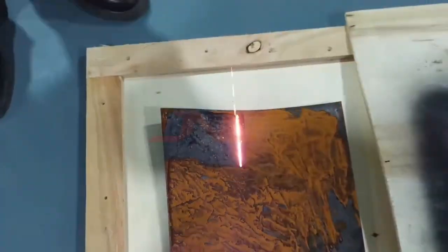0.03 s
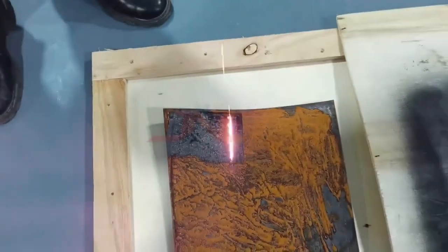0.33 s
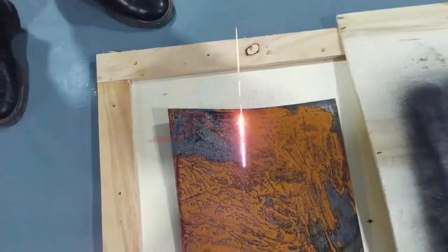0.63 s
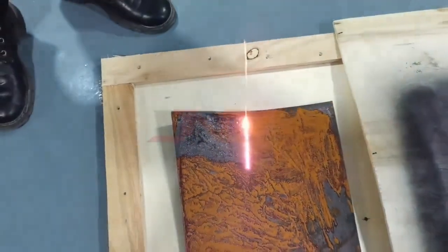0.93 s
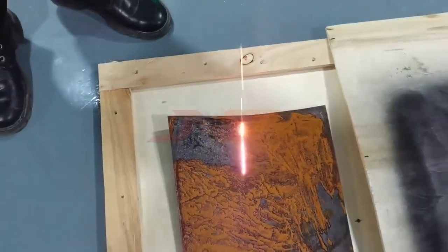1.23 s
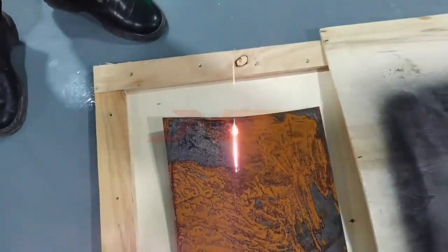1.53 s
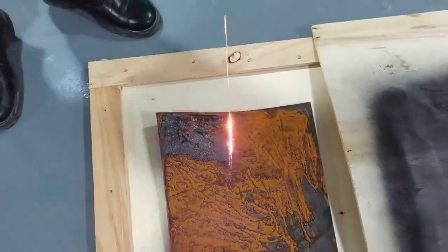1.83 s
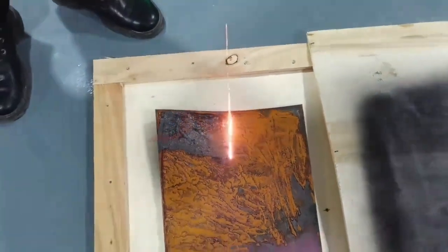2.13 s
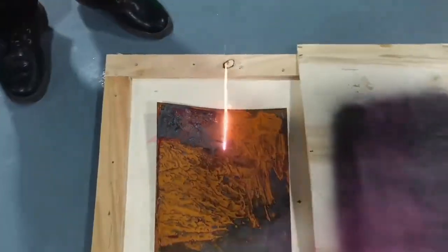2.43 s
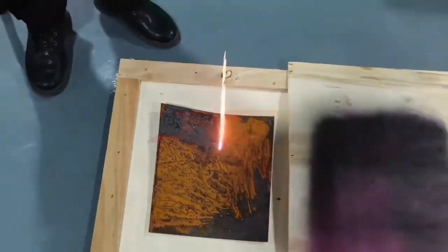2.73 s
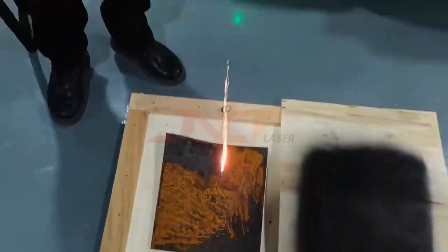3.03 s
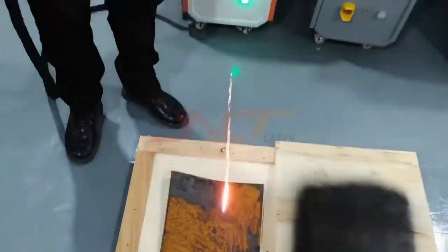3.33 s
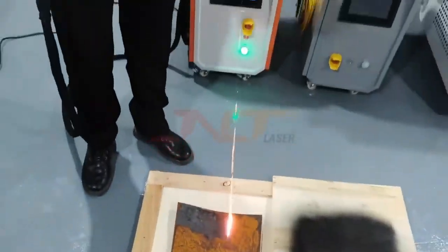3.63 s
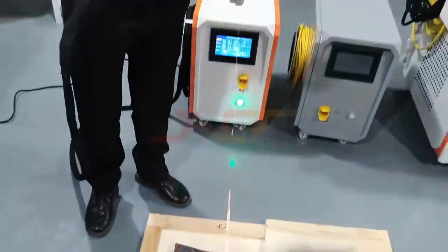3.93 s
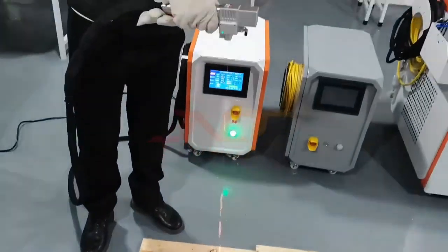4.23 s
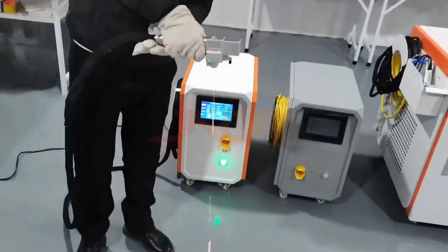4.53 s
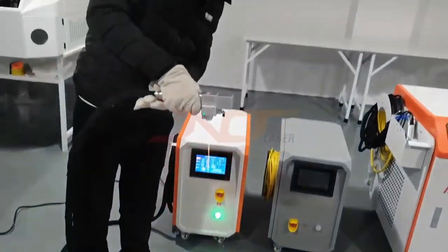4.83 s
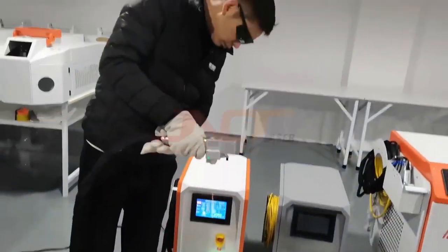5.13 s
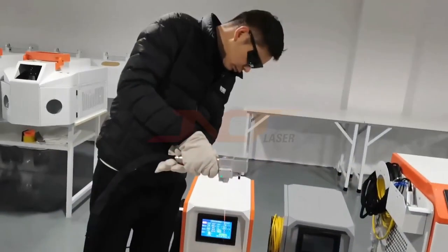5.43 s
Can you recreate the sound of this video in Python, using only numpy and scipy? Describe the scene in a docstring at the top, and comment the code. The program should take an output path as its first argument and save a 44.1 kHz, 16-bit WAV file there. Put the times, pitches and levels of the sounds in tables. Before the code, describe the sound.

In a workshop, rust crackles and buzzes in short, irregular spurts as a laser sweeps over a steel plate. After nearly two seconds the beam bites in and the rasp runs without a break, with a gritty sizzle and a low drone. It eases a little and takes on a slight metallic ring as the microphone moves away. A quiet fan and a faint rumble lie behind it.

```python
"""A hand-held cleaning laser sweeps to and fro over a rusty steel plate, 89 times a second.
Bursting rust pops at the turn of each sweep and rasps along the strokes, first in bursts, then
without a break. Echoes smear the pops into a harsh buzz, grit sizzles and loose flakes crack off.
The microphone backs away. A cooling fan and a faint rumble run underneath."""
import sys
import numpy as np
from scipy.fft import rfft, irfft, next_fast_len
from scipy.io import wavfile
from scipy.ndimage import uniform_filter1d, map_coordinates

SR = 44100
rng = np.random.default_rng(int(sys.argv[2]) if len(sys.argv) > 2 else 0)


def wav_out(sig):
    """Save sig, one row per channel (or a flat mono array), as 16-bit PCM at SR to the path in sys.argv[1]."""
    wavfile.write(sys.argv[1], SR, np.round(np.clip(np.atleast_2d(sig).T, -1, 1) * 32767).astype(np.int16))


N = 245637

SWEEP_HZ, TOP_HZ = 88.87, 14100  # the buzz is made of harmonics: multiples of the sweep rate
FULL_DB = -30  # body level of a full burst
STRIKE_S = 1.768  # the beam bites into thick rust and stays there

# Three bands called body, bite and fizz. Each row: low edge in Hz, high edge in Hz.
BANDS = [(750, 2500), (2500, 6000), (6000, 14000)]
# The beam crosses rust patches. Each row: time of full strength and hold in seconds, body level in dB,
# bite and fizz in dB above the body, share heard as one sharp pop.
BURSTS = [(0, 0.0067, -38.5, 4, 1, 0.75), (0.083, 0.014, -34, 4, -7, 0.73),
          (0.126, 0.045, -32.5, -3, -10, 0.78), (0.24, 0.013, -41.5, 6.5, 0, .6),
          (0.307, 0.013, -35, -9, -10, 0.66), (0.35, .03, -31, -2, -8.5, 0.76),
          (0.394, 0.013, -30.5, -4, -9.5, 0.7), (.44, .03, -33, 4, -5, 0.54),
          (0.522, 0.061, -35, 0, -4, 0.1), (0.69, .012, -32.5, 4.5, -6, .35),
          (0.727, 0.011, -34.5, -6, -8, .72), (.79, 0.022, -39, -2.5, -7, 0.24),
          (0.996, 0.096, -31.5, 1.5, -4.5, 0.3), (1.185, 0.042, -35.5, 0.5, -6, 0.6),
          (1.292, .005, -41.5, 0, 0, 1), (1.33, 0.014, -29, 2, -5.5, 0.3),
          (1.47, .02, -38, 2.5, -3.5, 0.64), (1.521, 0.026, -40.5, 4, -10, 0.52),
          (2.459, 0.0083, -30, -4.5, -9, 0.33), (2.561, 0.012, -32.5, 0, -8, .25)]
# Almost bare steel between patches: body, bite and fizz in dB.
SMOULDER_DB = [-45, -40, -45.5]
# Thick rust burning. Each row: time in seconds, level in dB, bite in dB above the body.
LONG_BURN = [(1.78, -34, 3.5), (1.85, -29.5, -1.5), (1.89, -27, 1.5), (2.02, -27.7, 4), (2.1, -31.5, 0.5),
             (2.16, -28, 0.5), (2.29, -29.5, 0), (2.36, -33, -1), (2.41, -31, 2), (2.62, -34, 4),
             (2.82, -30.5, 1.5), (2.97, -34, 1), (3.13, -32.5, 1.5), (3.28, -37, 3), (3.45, -34, 0),
             (3.68, -35.5, 5.5), (3.77, -33, 3), (3.9, -38, 2), (4.08, -32.5, 2), (4.2, -36, 1),
             (4.5, -32.5, 1.5), (4.75, -35, 3.5), (4.97, -33, 3.5), (5.17, -36.5, 2.5), (5.45, -33.5, 0.5),
             (5.57, -34.5, 1.5)]
# Its fizz. Each row: time in seconds, level in dB.
LONG_FIZZ = [(1.78, -38), (1.9, -34), (2.25, -34), (2.7, -36), (3.15, -35), (3.25, -38), (3.75, -40.5),
             (4.1, -39.5), (4.3, -41.5), (4.52, -38), (5.15, -44), (5.27, -39.5), (5.57, -40)]
# From plate to microphone. Each row: time in seconds, distance in metres.
DISTANCE = [(0, 2.045), (.5, 1.99), (1, 1.92), (1.65, 1.85), (1.9, 1.82), (2.25, 1.82), (3, 2.02),
            (3.5, 2.2), (4, 2.3), (4.7, 2.34), (5.57, 2.27)]

# Low harmonics over patchy rust, over thick rust and from further off.
# Each row: harmonic number, relative level in dB.
PATCHY_LOWS = [(1, -67), (3, -58.5), (5, -50.5), (7, -51), (9, -47.5), (10, -50.5), (11, -56), (13, -48),
               (15, -43), (16, -44.5), (17, -45.5), (18, -45), (19, -43.5), (20, -45), (21, -45.5),
               (22, -49.5), (23, -39), (24, -47), (25, -38), (26, -51.5), (27, -38), (28, -47)]
THICK_LOWS = [(1, -62.5), (3, -55.5), (5, -52.5), (7, -47), (9, -45), (10, -47), (11, -48.5), (13, -41),
              (15, -41), (16, -43.5), (17, -42.5), (18, -44), (19, -42.5), (20, -36), (21, -38.5),
              (22, -43), (23, -41), (24, -38.5), (25, -39), (26, -41), (27, -55), (28, -38)]
FAR_LOWS = [(1, -82), (3, -48), (5, -47), (7, -60), (9, -74), (10, -61), (11, -37), (13, -45), (15, -42),
            (16, -42.5), (17, -57), (18, -56.5), (19, -67), (20, -52.5), (21, -55), (22, -31), (23, -44),
            (24, -38), (25, -55), (26, -37), (27, -48), (28, -46.5)]
# The treble at those three stages. Each row: frequency in Hz, relative level in dB.
PATCHY_TREBLE = [(2650, -44.5), (2900, -47), (3250, -46), (3700, -45), (4400, -46), (5000, -55),
                 (6200, -54), (7100, -55.5), (7900, -65), (9500, -57), (11000, -59), (12300, -68.5),
                 (13300, -67), (14200, -82)]
THICK_TREBLE = [(2650, -43), (2900, -38.5), (3250, -42), (3700, -39.5), (4400, -45), (5000, -47),
                (6200, -47.5), (7100, -47.5), (7900, -55), (9500, -52.5), (11000, -61), (12300, -63),
                (13300, -61.5), (14200, -64)]
FAR_TREBLE = [(2650, -39.5), (2900, -39.5), (3250, -47.5), (3700, -47), (4400, -34.5), (5000, -55.5),
              (6200, -77), (7100, -54), (7900, -55), (9500, -55.5), (11000, -54), (12300, -76),
              (13300, -66), (14200, -71)]
# How the stages blend. Each row: time in seconds, stage (0 patchy, 1 thick, 2 far).
STAGE = [(1.76, 0.08), (1.8, 0.28), (2.4, 0.99), (3.6, 1.16)]
# Where the near pop stands out of its echoes. Each row: frequency in Hz, weight in dB.
POP_CLARITY = [(100, -3), (500, -.5), (1000, 0), (3000, 0), (4500, -1.5), (6000, -4), (10000, -3),
               (14000, -7)]
# Crackle in the echoes. Each row: frequency in Hz, share that is new in every sweep.
FRESH_SHARE = [(100, 0.018), (600, 0.0082), (1200, 0.13), (2500, 0.39), (5500, 0.58), (11000, 1)]
# Fading as beam and microphone move. Each row: frequency in Hz, share of the remaining echo that fades.
FADING_SHARE = [(100, 0.26), (800, 0.4), (2500, 0.7), (5000, 0.71), (10000, 1)]

# Numbers of the even harmonics that make the drone.
DRONE_HARMONICS = [2, 4, 6, 8, 12, 14]
# For each of them: dB above the body of a full burst at each stage, before any dips.
PATCHY_DRONE_DB = [-23.5, -19, -11, -13, -23, -13.5]
THICK_DRONE_DB = [-16, -18.5, -7, -14, -19, -9.5]
FAR_DRONE_DB = [-12.5, -4, -13, -12.5, -10, -9]
# For each of them: dB gained per dB of body.
DRONE_FOLLOWS = [1.06, 1.17, 0.92, 0.97, 1.1, 0.92]
# Quiet spots in the room's standing waves. Each row lists the dips of one drone harmonic:
# time in seconds, half width in seconds, depth in dB.
QUIET_SPOTS = [
    [(3.05, 0.59, -10), (5.45, .28, -10)],
    [(2.7, 0.39, -7), (3.25, 0.24, -12), (4.45, 0.34, -4.5)],
    [(2.85, .15, -10), (3.62, 0.16, -11.5), (4.8, 0.38, -13)],
    [(2.9, 0.27, -7.5), (4.37, 0.12, -16), (4.95, 0.23, -13)],
    [(3.05, 0.23, -15), (3.85, 0.19, -19)],
    [(2.65, 0.13, -16), (2.95, 0.061, -19), (4.85, 0.39, -6)],
]

# The tone of three noises. Each row: frequency in Hz, relative level in dB.
SIZZLE_TONE = [(100, -16.5), (700, -3.5), (1600, 1.5), (4400, 0), (5200, 5), (7100, -2.5), (7900, -16.5),
               (10000, -12.5), (12300, -8.5), (14000, -36)]
FAN_TONE = [(20, -12), (100, -8), (300, -3), (1000, 0), (3000, 0), (14000, -10)]
RUMBLE_TONE = [(20, -17), (60, -2), (150, 0), (400, 2), (1500, -4), (5000, -58)]
# Loose flakes. Each row: rough time in seconds, strength in dB.
FLAKES = [(.062, -17), (.083, -14), (.22, -19), (.231, -12), (.309, -16.5), (1.628, -21)]


def amp(db):
    """Turn decibels into a gain."""
    return 10 ** (np.asarray(db) / 20)


def unit(x):
    """Scale to an average power of 1."""
    return x / np.sqrt(np.mean(abs(x) ** 2) + 1e-20)


def along(points, hz):
    """Read a table at these frequencies, on a pitch-like scale."""
    freqs, values = np.transpose(points)
    return np.interp(np.log(hz + 1), np.log(freqs + 1), values)


def curves(rows, t):
    """Read each column after the first at times t."""
    times, *columns = np.transpose(rows)
    return np.array([np.interp(t, times, column) for column in columns])


def ramp(t, start_s, length_s):
    """A straight rise from 0 to 1."""
    return np.clip((t - start_s) / length_s, 0, 1)


def bell(x, centre, width):
    """A smooth hump of height 1."""
    return np.exp(-((x - centre) / width) ** 2)


def filtered(x, response):
    """Give each frequency in x the gain that response asks for."""
    size = next_fast_len(N + SR // 2)
    return irfft(rfft(x, size) * response(np.fft.rfftfreq(size, 1 / SR)), size)[:N]


def noise(tone):
    """Noise of power 1 with the given tone."""
    return unit(filtered(rng.standard_normal(N), lambda hz: amp(along(tone, hz))))


def drift(t, rate, count):
    """Smooth curves, each through rate random values a second."""
    knots = rng.standard_normal((count, 256))
    return np.transpose([map_coordinates(row, [t * rate], mode="mirror") for row in knots])


def bursts(t, rise_db_per_s=347, fall_db_per_s=175):
    """Body level in dB as each rust patch flares up, holds and dies away."""
    return np.array([db - rise_db_per_s * np.maximum(s - t, 0)
                     - fall_db_per_s * np.maximum(t - s - hold, 0) for s, hold, db, *_ in BURSTS])


def settled(t):
    """Goes from 0 to 1 as the first pops in thick rust merge into the long burn."""
    return ramp(t, STRIKE_S + .065, length_s=.044)


def burn(t, body_lag_s=.0028, bare_s=1.626, bare_db_per_s=47):
    """Body, bite and fizz in dB: rust bursts over a smoulder that dies away, then burns steadily."""
    *_, bite_db, fizz_db, _ = np.transpose(BURSTS)[:, :, None]
    bursts_db = [bursts(t - body_lag_s), bursts(t) + bite_db, bursts(t) + fizz_db]
    burst_power = np.sum(amp(bursts_db) ** 2, axis=1)
    smoulder = amp(np.c_[SMOULDER_DB] - bare_db_per_s * np.maximum(t - bare_s, 0))
    level_db, tilt_db = curves(LONG_BURN, t)
    body_db = level_db - tilt_db / 2 - 3.5 * (1 - settled(t))  # weak until the burn settles
    steady = amp([body_db, level_db + tilt_db / 2, curves(LONG_FIZZ, t)[0]])
    steady *= ramp(t, STRIKE_S, length_s=.006)
    return 10 * np.log10(burst_power + smoulder ** 2 + steady ** 2)


def flicker(t, depth_db, rate):
    """Uneven rust makes the three bands flicker, partly together and partly alone."""
    shared, *own = drift(t, rate, count=len(BANDS) + 1).T
    return depth_db * (shared + np.array(own))


def pop_shares(t, smoulder_pop=.3, steady_pop=.22, strike_pop=.8):
    """Share of the power heard as a sharp pop at the near and the far turn of the sweep."""
    patches = amp(bursts(t)) ** 2
    smoulder = amp(SMOULDER_DB[0]) ** 2 * (t < STRIKE_S)
    steady = amp(curves(LONG_BURN, t)[0]) ** 2 * (t >= STRIKE_S)
    near = np.array(BURSTS)[:, -1] @ patches + smoulder_pop * smoulder + steady_pop * settled(t) * steady
    far = strike_pop * (1 - settled(t)) * steady  # thick rust pops at the far turn first
    return np.clip(np.array([near, far]) / (patches.sum(axis=0) + smoulder + steady), 0, 1)


def pops(t, harmonics, scatter_db, spit_share, spit_s):
    """One pop a sweep: a short push and a sharp suck of air, amid a changing spit of rust."""
    hz = harmonics * SWEEP_HZ
    push_pull = np.exp(1j * np.pi * 5 / 6)
    lags_s = np.arange(-.0006, .003, .00003)
    specks = drift(t, rate=32, count=len(lags_s)) * np.exp(-abs(lags_s) / spit_s)
    fragments = unit(specks @ np.exp(-2j * np.pi * np.outer(lags_s, hz)))
    size = amp(scatter_db * rng.standard_normal((len(t), 1)))
    pop = np.sqrt(1 - spit_share) * push_pull + np.sqrt(spit_share) * fragments
    core = (hz > 1200) & (hz < 4500)  # here the spit changes the tone, not the energy
    return size * pop / np.sqrt(np.mean(abs(pop[:, core]) ** 2, axis=1, keepdims=True))


def echoes(t, harmonics, fade_rate):
    """The room scrambles each harmonic's timing; high ones fade in and out, and no two sweeps match."""
    count, hz = len(harmonics), harmonics * SWEEP_HZ
    shape = (len(t), count)
    standing = np.exp(2j * np.pi * rng.random(count))
    moving = unit(drift(t, fade_rate, count) + 1j * drift(t, fade_rate, count))
    crackle = unit(rng.standard_normal(shape) + 1j * rng.standard_normal(shape))
    fading, fresh = along(FADING_SHARE, hz), along(FRESH_SHARE, hz)
    lasting = np.sqrt(1 - fading) * standing + np.sqrt(fading) * moving
    return np.sqrt(1 - fresh) * lasting + np.sqrt(fresh) * crackle


def drone(t, room_lag_s=.012):
    """Two strokes a sweep make a drone. Its levels in dB follow the burn and dip at quiet spots."""
    thick = settled(t)
    away = ramp(t, start_s=2.29, length_s=.33)  # the microphone backs off
    tone_db = ((1 - thick) * np.c_[PATCHY_DRONE_DB] + (thick - away) * np.c_[THICK_DRONE_DB]
               + away * np.c_[FAR_DRONE_DB])
    dips_db = [sum(db * bell(t, s, width) for s, width, db in spots) for spots in QUIET_SPOTS]
    return FULL_DB + np.c_[DRONE_FOLLOWS] * (burn(t - room_lag_s)[0] - FULL_DB) + tone_db + dips_db


def buzz_tone(t, harmonics, shift_db=1.5, ring_db=4.5):
    """The changing rust favours shifting groups of harmonics; late on, a metallic ring comes and goes."""
    hz = harmonics * SWEEP_HZ
    stages = [(PATCHY_LOWS, PATCHY_TREBLE), (THICK_LOWS, THICK_TREBLE), (FAR_LOWS, FAR_TREBLE)]
    stage_db = [along(np.vstack([np.multiply(lows, [SWEEP_HZ, 1]), treble]), hz)
                for lows, treble in stages]
    blend = np.maximum(1 - abs(curves(STAGE, t).T - np.arange(len(stages))), 0)
    groups = unit(uniform_filter1d(drift(t, rate=8, count=len(hz)), size=3, axis=1))
    ring = np.outer(bell(t, centre=5.08, width=.38), bell(hz, centre=2830, width=250))
    return amp(blend @ stage_db + shift_db * groups + ring_db * ring)


def buzz_strengths(t, harmonics, bass_hz=350):
    """How hard the rust burns sets the strength of each harmonic in each sweep."""
    hz = harmonics * SWEEP_HZ
    size = buzz_tone(t, harmonics)
    burn_db = burn(t) + flicker(t, depth_db=.69, rate=22)
    bass_db = 1.5 + .56 * (burn_db[0, :, None] - FULL_DB)  # a harder burn has extra bass
    size *= amp((hz < bass_hz) * bass_db)
    drone_size = amp(drone(t).T)
    spread = [np.interp(np.log(hz), np.log(BANDS).mean(axis=1), row) for row in np.eye(len(BANDS))]
    for _ in range(3):  # each band's gain spills into the next, so approach the levels in steps
        band_sizes = [np.linalg.norm(size[:, (hz > low) & (hz < high)], axis=1) for low, high in BANDS]
        size *= amp((burn_db - 20 * np.log10(band_sizes)).T @ spread)
        size[:, np.isin(harmonics, DRONE_HARMONICS)] = drone_size
    return size


def travel_s(t):
    """Seconds the sound takes from plate to microphone."""
    return curves(DISTANCE, t)[0] / 343


def laser():
    """The beam bursts rust sweep after sweep; pops, echoes and drone join into a buzz."""
    now = np.arange(N) / SR
    clock = (now - travel_s(now)) * SWEEP_HZ + 1  # counts sweeps as they arrive
    t = np.interp(np.arange(int(clock[-1]) + 2), clock, now)  # one time per sweep
    harmonics = np.arange(1, TOP_HZ // SWEEP_HZ + 4)
    near, far = pop_shares(t)[:, :, None]
    near = near * amp(along(POP_CLARITY, harmonics * SWEEP_HZ))
    near_pop = np.sqrt(near) * pops(t, harmonics, scatter_db=1, spit_share=.42, spit_s=.0012)
    far_pop = np.sqrt(far) * pops(t, harmonics, scatter_db=.8, spit_share=.55, spit_s=.0014)
    far_pop *= (-1) ** harmonics  # half a sweep later
    room = echoes(t, harmonics, fade_rate=15)
    mix = near_pop + far_pop + np.sqrt(np.maximum(1 - near - far, 0)) * room
    mix = np.where(np.isin(harmonics, DRONE_HARMONICS), room / abs(room), mix)  # no pops in the drone
    spectra = np.pad(buzz_strengths(t, harmonics) * mix, ((0, 0), (1, 0)))
    # make one wave per sweep, then glide from each to the next
    cycles = irfft(spectra, 4096, norm="forward") / np.sqrt(2)
    return map_coordinates(cycles, [clock, clock % 1 * cycles.shape[1]], order=1, mode="grid-wrap")


def sizzle(gain_db):
    """Flying grit and late echoes lose the beat; they follow the burn and thin out when pops rule."""
    t = np.arange(N) / SR
    bite_db = burn(t)[1]
    smeared_share = np.clip(1 - pop_shares(t).sum(axis=0), 0, 1)
    return amp(bite_db + gain_db) * smeared_share * noise(SIZZLE_TONE)


def fan(level_db):
    """The cooling fan makes a steady rush of air."""
    return amp(level_db) * noise(FAN_TONE)


def rumble(rest_db, burn_db, bump_db):
    """A faint low rumble grows with the long burn and has one soft bump."""
    t = np.arange(N) / SR
    swell = amp(burn_db) * settled(t) + amp(bump_db) * bell(t, centre=4.89, width=.04)
    return (amp(rest_db) + swell) * noise(RUMBLE_TONE)


def flakes(width_s, spit_gain, spit_s, low_hz=1500, high_hz=7000):
    """Each loose flake cracks off in one puff, with a short spit of fragments."""
    cracks = np.zeros(N)
    for s, db in FLAKES:
        lag_s = travel_s(s)
        turn_s = np.round((s - lag_s) * SWEEP_HZ) / SWEEP_HZ  # at the turn of a sweep
        t = np.arange(N) / SR - lag_s - turn_s
        puff = ((t / width_s) ** 2 - 1) * np.exp(-(t / width_s) ** 2 / 2)
        spit = (t > 0) * amp(-60 * abs(t) / spit_s) * rng.standard_normal(N)
        cracks += amp(db) * (puff + spit_gain * spit)
    return filtered(cracks, lambda hz: ((1 + (hz / high_hz) ** 4) * (1 + (low_hz / (hz + 1)) ** 4)) ** -.5)


def scene():
    """Add up all the sounds; both channels are the same."""
    sound = laser() + sizzle(gain_db=-7) + fan(level_db=-56)
    sound += rumble(rest_db=-72, burn_db=-63, bump_db=-48)
    sound += flakes(width_s=.00006, spit_gain=.6, spit_s=.008)
    return np.array([sound, sound])


def record(dry):
    """The microphone cuts off sharply above TOP_HZ."""
    return np.array([filtered(x, lambda hz: 1 / np.sqrt(1 + (hz / TOP_HZ) ** 160)) for x in dry])


dry = scene()
out = record(dry)
wav_out(out)
```